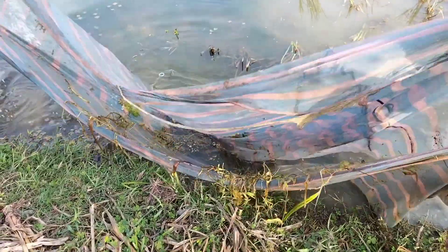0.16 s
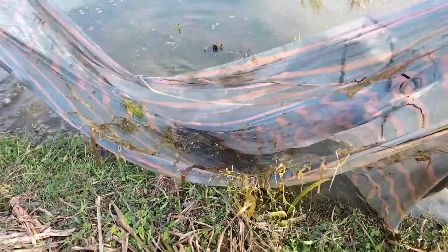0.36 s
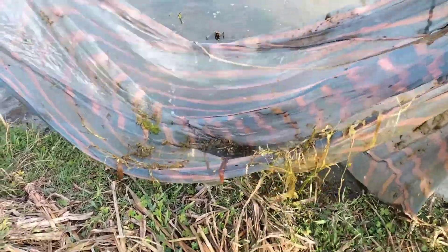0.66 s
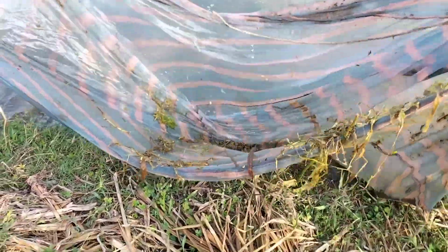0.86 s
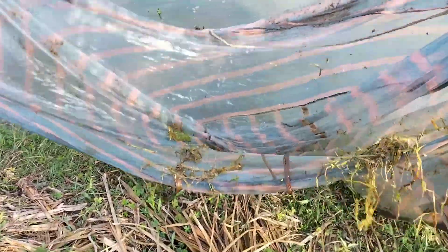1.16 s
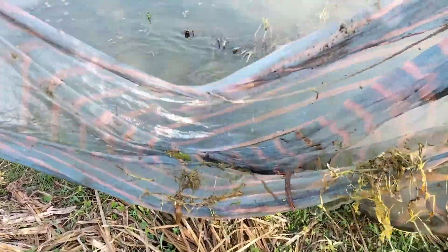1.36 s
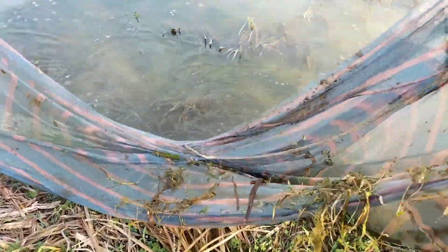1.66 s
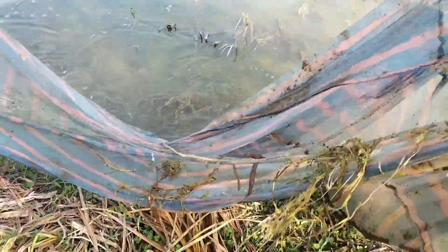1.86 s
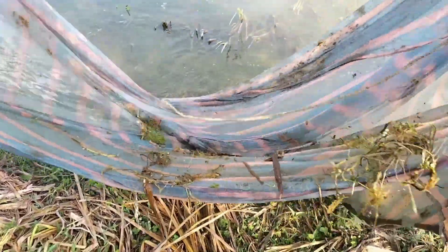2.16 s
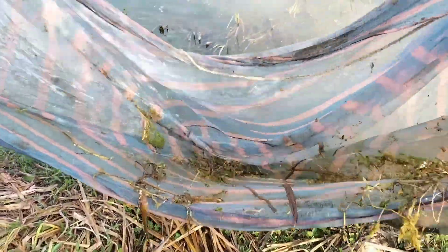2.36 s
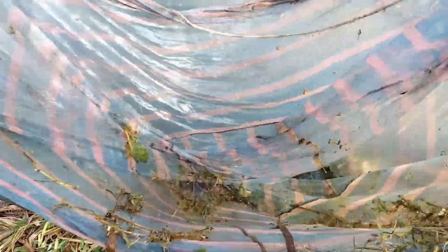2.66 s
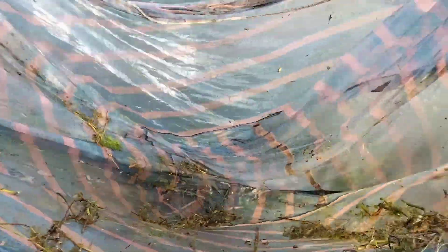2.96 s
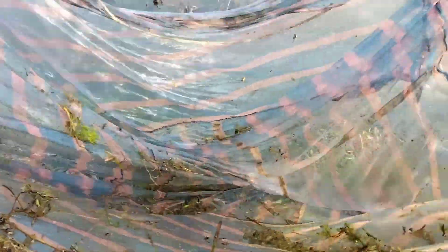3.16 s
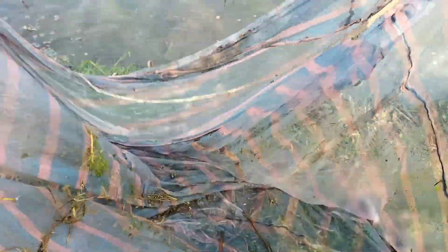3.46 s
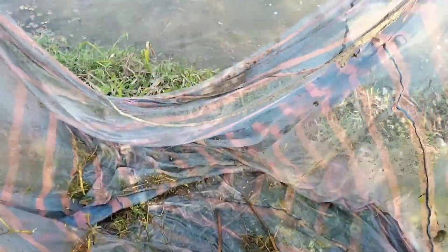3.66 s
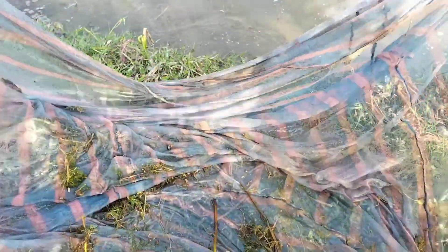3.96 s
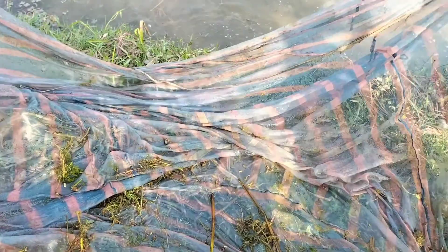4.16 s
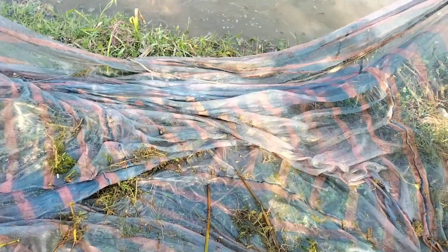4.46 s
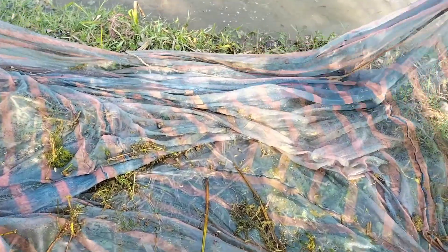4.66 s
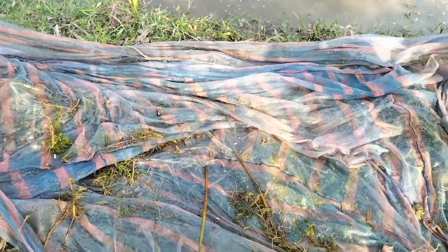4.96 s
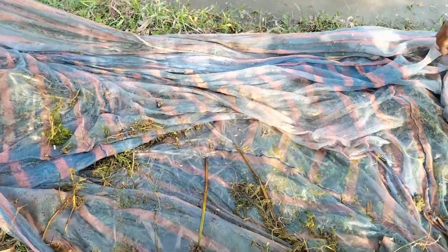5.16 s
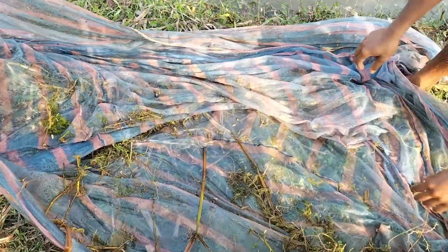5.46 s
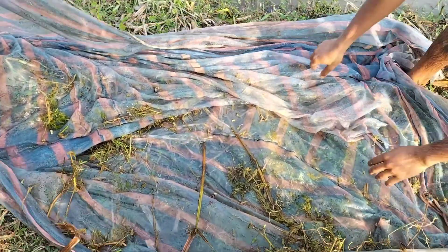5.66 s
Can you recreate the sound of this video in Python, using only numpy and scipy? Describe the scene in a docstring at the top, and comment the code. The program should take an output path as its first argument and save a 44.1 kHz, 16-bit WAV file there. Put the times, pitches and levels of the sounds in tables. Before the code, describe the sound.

Water bubbles and wet mesh rustles as a net is hauled ashore, dry stalks snapping, then birds chirp softly.

```python
"""Water sloshes and bubbles and wet mesh rustles: a fine net is hauled in tugs from a shallow pond.
Threads rub and slip over weeds, fizzing; trapped air rings as bubbles and gulps. Short squeaks, dry
stalks snapping on the bank, hard knocks. Behind, birds whistle and chirp, a far dove coos and
insect wings hum. Faint air hiss and a breeze on the microphone run throughout."""
import sys
import numpy as np
from scipy import signal
from scipy.fft import rfft, irfft
from scipy.io import wavfile
from scipy.ndimage import uniform_filter1d

SR = 44100
rng = np.random.default_rng(int(sys.argv[2]) if len(sys.argv) > 2 else 0)


def master_out(mix):
    """Clip the mix to full scale and print it as 16-bit PCM to the path in sys.argv[1]."""
    frames = np.transpose(np.atleast_2d(mix))
    ceiling = np.clip(frames, -1, 1)
    pcm = np.round(ceiling * 32767).astype(np.int16)
    wavfile.write(sys.argv[1], SR, pcm)


N = 255780
TIME_S = np.arange(N) / SR

# slow haul: t/s, rustle/dB, body/dB re rustle, fizz/dB re rustle, bubbling/dB
HAUL = [(0.0, -57, 7, -10, -49.5), (0.1, -58.5, -0.5, -12, -52), (0.24, -59.5, 6, -6.5, -55),
        (0.37, -56.5, 3, -6.5, -60.5), (0.52, -56, 2.5, -3, -62.5), (0.76, -54, 3, -10.5, -52),
        (0.93, -50.5, 4.5, -7.5, -51.5), (1.06, -46, -0.5, -12, -53.5), (1.29, -58, 5, -7.5, -61),
        (1.37, -57.5, 2.5, -7.5, -65), (1.84, -54.5, 5, -8, -63), (2.02, -62, 2, -10, -70),
        (2.73, -57.5, 5.5, -5, -61), (2.89, -50.5, 2, -5.5, -61), (3.09, -53.5, 2.5, -1.5, -61),
        (3.34, -60, 2, -4, -65), (3.58, -65, 4.5, -4.5, -66), (3.88, -63, 0, -10, -68.5),
        (4.23, -70, -2, -9, -69.5), (4.49, -71, 2, -13, -76.5), (4.62, -67, 3, -14, -71.5),
        (4.9, -70.5, 3, -12, -71), (5.17, -62.5, -1.5, -14, -71), (5.49, -57, -2, -16.5, -67.5),
        (5.69, -63, 0, -12.5, -71), (5.8, -74, 5, -10, -72)]
# tugs on the net: peak t/s, rise/s, fall/s, rustle gain/dB, extra fizz gain/dB, bubbling gain/dB
TUGS = [(.02, 0.021, 0.082, -1, 3, -2.5), (.17, 0.13, 0.19, 6.5, 2.5, -1),
        (.33, 0.056, 0.031, -9.5, 2.5, -4.5), (.41, 0.037, 0.087, 5.5, 0.5, 0.5),
        (0.628, 0.057, 0.006, 5.5, 2, 4.5), (.72, 0.018, 0.021, 8, -6, 6), (.84, 0.17, 0.047, 4, 4.5, 0),
        (1.174, 0.033, 0.066, 12, -1, 10), (1.3, 0.017, 0.28, 5.5, -3, 6),
        (1.532, 0.055, 0.059, 10.5, -4, 4.5), (1.65, 0.1, 0.039, 1.5, -1, 14),
        (1.921, 0.067, 0.45, 12, 5, 10), (2.179, 0.035, 0.03, 5.5, 11, -1), (2.22, 0.03, 0.076, 8.5, 7, 1),
        (2.31, 0.061, 0.027, 6, 15, 2), (2.41, 0.11, 0.1, 7, 2, 3.5), (2.72, 0.027, 0.066, 4.5, 8.5, 1),
        (2.8, 0.022, 0.085, 4, 4, 1), (2.95, 0.018, 0.019, 5.5, 4, 3.5), (3.17, 0.041, 0.47, 5.5, -2, 5.5),
        (3.53, 0.078, 0.054, 6.5, 0, 7), (3.859, 0.028, 0.027, 5.5, 9, 1), (4.49, 0.063, 0.074, 7, 4, 9.5),
        (4.7, 0.054, 0.065, 3, 4, 2), (5.33, 0.11, 0.089, 7, 2, 2), (5.62, 0.066, 0.088, 6.5, 2, 4.5),
        (5.68, 0.031, 0.015, 3.5, 4, 11.5)]
# low wash, before the bubbling's share: t/s, level/dB
WASH = [(0, -67), (.6, -68.5), (1.2, -66), (2, -64), (2.5, -59.5), (3, -62.5), (3.6, -60.5), (4.2, -65.5),
        (4.7, -64.5), (5.8, -66)]
# single bubbles: t/s, peak/dB, nominal f/Hz, t60/s (capped in bubble)
BUBBLES = [(0.058, -36.5, 3265, 0.042), (0.1, -38, 1030, 0.037), (0.161, -35, 960, 0.045),
           (0.179, -41, 2630, 0.023), (0.677, -48.5, 1070, 0.03), (0.69, -35.5, 2790, 0.061),
           (0.772, -36, 2700, .02), (0.931, -35, 2260, .025), (0.2, -39, 3250, 0.046),
           (0.22, -40, 3370, .04), (0.245, -38, 2980, .05), (0.759, -40, 1180, 0.015),
           (0.903, -35, 2200, 0.012), (0.904, -42.5, 955, 0.049), (0.927, -40, 966, 0.041),
           (0.956, -38.5, 1830, 0.027), (1.002, -45, 1036, 0.025), (1.087, -39, 1360, 0.015),
           (0.122, -37.5, 926, 0.039), (0.113, -34, 900, 0.09), (0.153, -22, 1324, 0.031),
           (0.167, -33, 1405, 0.042), (0.191, -35.5, 1400, 0.025), (0.206, -37.5, 1220, 0.08),
           (0.231, -36.5, 1610, 0.076), (0.424, -46.5, 950, 0.034), (0.433, -40, 1136, 0.015),
           (0.27, -44, 1300, 0.084), (3.636, -53, 1390, 0.03), (4.488, -45.5, 1040, 0.019),
           (0.436, -39.5, 1436, 0.078), (0.552, -42, 1360, 0.09), (0.578, -42.5, 1150, 0.043),
           (0.615, -40.5, 680, 0.025), (0.658, -43, 1300, 0.025), (0.724, -35.5, 1335, 0.022),
           (0.79, -37, 853, 0.033), (0.826, -39, 1420, 0.014), (0.872, -40.5, 1600, 0.022),
           (0.917, -37, 1677, 0.084), (0.973, -39.5, 1110, 0.074), (1.063, -38, 2130, 0.034),
           (1.532, -46, 1510, 0.069), (1.55, -36, 1790, 0.031), (1.613, -37.5, 832, 0.035),
           (1.911, -43.5, 960, 0.018), (2.208, -50.5, 1276, 0.073), (3.322, -44.5, 1620, 0.0079),
           (3.801, -52, 1625, 0.033), (5.354, -53, 1590, 0.047), (5.551, -48, 1740, 0.018)]
# gulps of trapped air: t/s, length/s, level/dB, start f/Hz, end f/Hz
GULPS = [(0.002, 0.042, -55, 395, 376), (0.043, 0.044, -56, 288, 297), (0.075, 0.028, -53.5, 327, 373),
         (1.285, 0.024, -55.5, 287, 310), (1.613, 0.066, -44.5, 181, 195), (1.614, 0.054, -40, 361, 396),
         (1.642, 0.067, -44.5, 272, 366), (1.714, 0.049, -39, 319, 285)]
# rubbing mesh spectrum: f/Hz, level/dB
MESH_SPECTRUM = [(1060, -53), (1800, -89), (1950, -14), (2080, -2), (2640, 7), (3720, 0.5), (4760, -3),
                 (5760, -2), (6200, -1.5), (6910, -2.5), (7920, -3), (9580, -19), (12800, -19),
                 (14500, -16), (15250, -12), (15800, -18.5)]
# resonant peaks that colour the rustle: f/Hz, width/Hz, gain/dB
RUSTLE_PEAKS = [(2200, 540, 4), (3280, 140, 5.5), (3620, 580, 8.5), (4000, 250, 6), (5900, 160, 1.5),
                (6760, 450, 6.5), (7120, 110, 6), (11400, 770, 0.5)]
# rustle colour as the net slackens: t/s, low edge gain/dB, gain between the ridges/dB
RUSTLE_COLOUR = [(0, 4, 2), (.26, 1.5, 4), (.3, -14.5, 2), (.36, -3.5, 4), (.45, -2, 3), (.7, 1.5, 0),
                 (1.1, -2, 0.5), (1.5, -4.5, -2.5), (1.9, -5, 0), (2.3, -2, 1.5), (2.7, -4, 1),
                 (3.1, 1.5, 1.5), (3.6, -1, -2.5), (4.2, 3.5, -2.5), (4.8, -3, -3), (5.2, -3.5, -5.5),
                 (5.501, -1, -8), (5.8, -2, -0.5)]
# highest fizz band: t/s, gain/dB
TOP_FIZZ = [(0, -4.5), (1.2, 2.5), (1.8, -5.5), (2.2, -9.5), (2.8, -8), (3.5, -5), (4.3, 2.5), (4.9, 3),
            (5.33, 11.5), (5.8, -0.5)]
# background air spectrum: f/Hz, level/dB
AIR_SPECTRUM = [(82, -26), (140, 6), (328, 7), (477, -49.5), (668, 5), (782, -22), (1050, -10), (1940, -18),
                (3590, -2.5), (4820, -69), (6890, -2), (9640, -56), (14900, -19), (15800, -43)]
# breeze: t/s, level/dB
BREEZE = [(0, -70), (.8, -68), (1.5, -72), (2.7, -70.5), (3.5, -69), (3.9, -68), (4.3, -70), (5, -70.5),
          (5.8, -71)]
# pips, squeaks and scrapes: t/s, level/dB, f/Hz, length/s
PIPS = [(0.29, -52, 3120, 0.021), (0.31, -47, 2840, 0.0086), (0.32, -57, 2760, 0.021),
        (0.366, -48, 2950, 0.014), (0.381, -52, 2540, 0.012), (2.79, -53, 5100, .03),
        (2.798, -54, 3610, .03), (2.842, -51.5, 3420, 0.049), (2.955, -57, 5780, 0.044),
        (3.03, -54, 3970, .04), (3.047, -59, 5850, 0.045), (3.095, -50, 3150, 0.055),
        (3.194, -54, 2200, .05), (4.328, -58, 3280, 0.011), (4.37, -67, 3150, .012),
        (4.417, -60.5, 3020, 0.02), (5.348, -51.5, 3470, 0.018), (5.38, -58, 3510, 0.013),
        (5.398, -58, 3620, 0.022)]
# stalk snaps: t/s, main ring peak/dB, deep, thud, bright, top gains/dB, main ring f/Hz, crackle t60/s
SNAPS = [(0.412, -41, -35, -28, -2, -20, 3280, 0.0069), (0.536, -41, -38, -5, -16, -19, 2450, 0.016),
         (0.614, -34.5, -33, -5.5, 3, -28, 2800, 0.01), (0.7242, -31, -38, -25, -23, -32, 2500, 0.013),
         (0.762, -36, -44, -16, -18, -27, 2560, 0.0074), (0.77, -26.5, -38, -20, -13, -30, 3170, 0.0064),
         (0.8221, -37, -20, -2.5, 6, -20, 2980, 0.0051), (0.9209, -30, -42, -29, -5, -7, 3320, 0.0031),
         (0.9973, -32.5, -43, -26, -3, -26, 4150, 0.0046), (1.023, -32, -39, -21, -20, -29, 3200, 0.0058),
         (1.063, -37.5, -27, -6, -16, -28, 3550, 0.0065),
         (1.1768, -13.5, -19.5, -6.5, 0.5, -23, 3500, 0.0093),
         (1.3294, -11, -39, -10, -1.5, -16.5, 3550, 0.0099), (1.6143, -35, -24, -7, -28, -24, 3400, 0.0081),
         (1.7691, -31.5, -15, -18, 6, -6, 3830, 0.015), (1.774, -33, -31, -25, 0, -20, 4300, 0.0085),
         (1.828, -49.5, -30, -25, -2, 1.5, 3800, 0.0045), (1.938, -24, -22.5, -11, -7, -12.5, 2370, 0.0049),
         (2.169, -42, -36, -27, -3, -8, 4250, 0.01), (2.177, -53.5, -30, -20, -5, 17, 3900, 0.0053),
         (2.2995, -53, -28, -19, 13, 9, 3520, 0.0041), (2.381, -47, -35, -30, -16, -23, 2900, 0.0064),
         (2.403, -30.5, -36, -24, -22, -30, 3790, 0.0043),
         (2.5239, -42, -19.5, -19, -14, -26, 3700, 0.0065),
         (2.7347, -42.5, -20, -22, 1.5, -24, 4030, 0.007), (2.797, -44, -25, -19, 7, -4, 3400, 0.008),
         (2.951, -47, -20, -17, 10, -18, 3540, 0.007), (3.555, -46, -17, -8, -15, -22, 3300, 0.0067),
         (3.715, -58, -27, -20, -15, -25, 3240, 0.0078), (3.7223, -45, -23, -23, -18, -29, 3260, 0.0046),
         (3.804, -50, -5.5, 1, -1, -23, 2770, 0.033), (3.8606, -48.5, -27, 2, 9.5, -18, 2520, 0.0093),
         (3.937, -49.5, -25, -0.5, 1, -17, 3200, 0.0052), (4.011, -51, -24, -17, 1, -12, 3580, 0.0058),
         (4.463, -62, -32, -20, 9.5, -20, 4150, 0.0063), (4.488, -54.5, -40, 12.5, -2, -29, 3950, 0.0075),
         (4.56, -51.5, -30, -13, -14, -26, 2200, 0.008), (4.6036, -50, -30, -25, -5, -29, 4000, 0.0057),
         (4.73, -53, -32, -25, -3, -20, 3300, 0.006), (4.757, -55, -30, -25, -10, -20, 3550, .007),
         (4.767, -65, -30, -25, 3, -8, 3800, .005), (4.86, -55.5, -34, -28, -1, -17, 3500, 0.006),
         (5.153, -59, -20, -25, 7, -5, 3900, 0.0052), (5.404, -54, -30, -25, 6, -6, 4470, 0.006),
         (5.4308, -46, -31, -33, -7, -21, 2580, 0.0045), (5.558, -46, -33, -14, 2, -14, 2290, 0.008),
         (5.62, -55, -30, -25, 12, -8, 4000, 0.0071)]
# fixed resonances that colour every snap: f/Hz, width/Hz, level/dB
SNAP_RESONANCES = [(109, 230, -14), (360, 900, 3), (746, 1040, 9.5), (1430, 450, 4), (1950, 710, -3),
                   (6630, 360, 2), (8300, 160, -14.5), (10300, 2300, 5.5), (12300, 2300, 1.5),
                   (15600, 500, -3)]
# knocks: t/s, level/dB, low, middle, top gains/dB
KNOCKS = [(1.7683, -8, 2, 4, 0), (1.994, -25, -24, -12, -21), (2.2136, -32, -19, -8, -3),
          (4.8007, -35, -30, -5, -15), (4.966, -41, -30, -10, -12), (5.078, -52, -30, -15, -12)]
# modes of the hard object: f/Hz, width/Hz, level/dB
KNOCK_MODES = [(152, 310, -16), (600, 1360, 0.5), (1300, 850, 2), (4140, 190, -9.5), (5730, 360, -3.5),
               (7540, 820, -8), (10340, 1240, -7)]
# long falling whistle: t/s, f/Hz, level/dB
FALLING_WHISTLE = [(2.06, 3960, -56), (2.095, 3893, -55), (2.135, 3750, -56), (2.17, 3662, -46),
                   (2.2, 3400, -55), (2.24, 2990, -46), (2.28, 2786, -54), (2.31, 2580, -61.5),
                   (2.358, 2370, -61), (2.4, 2260, -66)]
# whistled notes: t/s, length/s, level/dB, onset/dB re level, start, turn, end f/Hz,
# turn/length, loudest/length, bend exponent (1 = straight)
NOTES = [(3.489, 0.18, -56, -4, 3810, 3877, 4180, 0.68, 1, 1.5),
         (3.748, 0.092, -55.5, -13, 2460, 2540, 2260, 0.47, 0.41, 1.2),
         (4.039, 0.071, -64, -11, 2390, 2490, 2170, 0.46, 0.54, 1.7),
         (4.339, 0.078, -44, -13, 3930, 4184, 3340, 0.38, 0.38, 1.3),
         (4.559, 0.2, -44, -42, 2750, 3430, 1900, 0.39, 0.67, 1.64),
         (4.87, 0.13, -51, -5, 2120, 2460, 2080, 0.63, 0.65, 0.91),
         (5.133, 0.11, -61.5, -1, 3100, 2920, 2470, .72, 0.87, 1.4),
         (5.187, 0.13, -51, -18, 2070, 2430, 2200, 0.4, 0.48, 1.8),
         (5.56, 0.11, -51.5, -2, 2320, 2443, 1990, 0.46, 0.49, 1.45)]
# thin raspy chirr: columns as NOTES
CHIRR = 4.48, .19, -66, -5, 7500, 7800, 7250, .15, .8, .45
# dove coos: t/s, length/s, level/dB, f/Hz
COOS = [(3.47, 0.25, -74, 330.4), (4.463, 0.36, -77, 324.7), (4.978, 0.33, -72.5, 344),
        (5.343, 0.2, -66, 341), (5.59, .14, -67.5, 352)]
# insect wings: start t/s, end t/s, f/Hz, level/dB
WING_HUM = 3.85, 5.75, 670.5, -76.5
# second bird's rising chirps: t/s, level/dB, length/s
CHIRPS = [(4.046, -63, 0.084), (4.237, -62.5, 0.093), (4.471, -62.5, 0.097), (4.645, -63, 0.096),
          (4.904, -64, 0.092), (5.151, -63.5, .075), (5.51, -56, 0.08)]


def amp(db):
    return 10 ** (np.asarray(db) / 20)


def unit_rms(x):
    return x / np.sqrt(np.mean(x ** 2) + 1e-20)


def spectrum_db(points, hz):
    f, db = np.transpose(points)
    return np.interp(np.log(hz + 1), np.log(f + 1), db)


def curves(rows):
    """One per-sample curve for each column after t/s."""
    s, *columns = np.transpose(rows)
    return [np.interp(TIME_S, s, column) for column in columns]


def add(mix, s, sound):
    part = mix[max(round(s * SR), 0):][:len(sound)]
    part += sound[:len(part)]


def band(x, lo_hz, hi_hz):
    return signal.sosfilt(signal.butter(4, [lo_hz, hi_hz], "band", fs=SR, output="sos"), x)


def band_noise(lo_hz, hi_hz):
    return unit_rms(band(rng.standard_normal(N), lo_hz, hi_hz))


def wobble(n, span):
    return unit_rms(uniform_filter1d(rng.standard_normal(n), span))


def hiss(spectrum, patchy_db, flicker_db, streaky_db=0):
    """Noise with spectral patches, long narrow streaks and broadband flicker."""
    frames, hz = N // 128 + 5, np.fft.rfftfreq(512, 1 / SR)
    real, imag, patches, streaks = rng.standard_normal((frames, 257, 4)).T
    patches = unit_rms(uniform_filter1d(uniform_filter1d(patches, 6, axis=0), 12, axis=1))
    streaks = unit_rms(uniform_filter1d(uniform_filter1d(streaks, 3, axis=0), 36, axis=1))
    db = spectrum_db(spectrum, hz)[:, None] + patchy_db * patches + streaky_db * streaks
    db += flicker_db * wobble(frames, 3)
    return unit_rms(signal.istft((real + 1j * imag) * amp(db), nperseg=512, noverlap=384)[1][:N])


def bubble(hz, t60_s, climb=.045):
    """Soft-onset ring; pitch climbs as the bubble nears the surface."""
    t60_s = np.clip(t60_s, 1e-4, .065)
    t = np.arange(0, t60_s, 1 / SR)
    onset = 1 - np.exp(-t * hz / 13)
    return np.sin(2 * np.pi * hz * t * (1 + climb * t / t60_s)) * amp(-60 * t / t60_s) * onset


def grains(lo_hz, hi_hz, per_s, ringing, spread_db, pitches):
    """Random short rising rings, a few loud; t60 is 2.7 * ringing cycles."""
    clicks = amp(spread_db * np.minimum(rng.exponential(1, N), 5)) * (rng.random(N) < per_s / SR)
    pitch, out = rng.integers(0, pitches, N), np.zeros(N)
    for k, hz in enumerate(np.geomspace(lo_hz, hi_hz, pitches)):
        out += signal.oaconvolve(clicks * (pitch == k), bubble(hz, ringing * 2.7 / hz))[:N]
    return unit_rms(out)


def tone(rows, flutter, span):
    """Start t/s and sine along rows of t/s, f/Hz, level/dB; flutter is smoothed over span samples."""
    s, hz, db = np.transpose(rows)
    t = np.arange(s[0], s[-1], 1 / SR)
    hz = uniform_filter1d(np.interp(t, s, hz), 700, mode="nearest")
    wave = np.sin(2 * np.pi * np.cumsum(hz) / SR) * signal.windows.tukey(len(t), .25)
    wave *= 1 + flutter * wobble(len(t), span)
    return s[0], np.sqrt(2) * amp(np.interp(t, s, db)) * wave


def haul():
    """Slow pull plus tugs: rustle, body, fizz and bubbling levels/dB."""
    rustle_db, body_db, fizz_db, bubbling_db = curves(HAUL)
    tug_rustle_db, tug_fizz_db, tug_bubbling_db = sum(
        np.outer(gains_db, np.interp(TIME_S, [s - rise_s, s, s + fall_s], [0, 1, 0]))
        for s, rise_s, fall_s, *gains_db in TUGS)
    rustle_db += tug_rustle_db
    fizz_db += tug_fizz_db
    return rustle_db, rustle_db + body_db, rustle_db + fizz_db, bubbling_db + tug_bubbling_db


def water(bubbling_db):
    """Trapped air rings: a crowd of small bubbles, a low wash, single bubbles, deep gulps."""
    crowd = grains(650, 3110, per_s=1800, ringing=9, spread_db=3.4, pitches=24)
    crowd += amp(3) * band_noise(860, 1940)
    wash = grains(284, 566, per_s=170, ringing=2.9, spread_db=2, pitches=12)
    wash += amp(-2.5) * band_noise(213, 700)
    wash_db = curves(WASH)[0] + .81 * (bubbling_db + 56.5)
    out = amp(bubbling_db) * unit_rms(crowd) + amp(wash_db) * unit_rms(wash)
    for s, db, hz, t60_s in BUBBLES:
        neighbour = .43 * np.roll(bubble(hz * 1.02, t60_s), 150)
        ring = bubble(hz * .95, t60_s) + neighbour
        churn = unit_rms(uniform_filter1d(wobble(3000, 60), 60))
        ring *= 1 + .45 * churn[:len(ring)]
        add(out, s - .001, amp(db) * ring / abs(ring).max())
    for s, length_s, db, start_hz, end_hz in GULPS:
        gulp = [(s, start_hz, db - 3), (s + .26 * length_s, start_hz, db),
                (s + length_s, end_hz, db - 3.5)]
        add(out, *tone(gulp, flutter=.3, span=500))
    return out


def net(rustle_db, body_db, fizz_db):
    """Wet threads rub and slip over weed: hiss and tiny rings, in three ranges that follow the haul."""
    hz = np.fft.rfftfreq(N, 1 / SR)
    slips = grains(2000, 9000, per_s=1700, ringing=45, spread_db=2.6, pitches=40)
    slips += amp(-2) * grains(8600, 17000, per_s=900, ringing=2.5, spread_db=2.8, pitches=6)
    ticks = amp(-4) * grains(2200, 7000, per_s=500, ringing=6, spread_db=3.6, pitches=10)
    rings = unit_rms(irfft(rfft(slips + ticks) * amp(spectrum_db(MESH_SPECTRUM, hz)), N))
    rub = hiss(MESH_SPECTRUM, patchy_db=1.8, flicker_db=1.5, streaky_db=2.8) + amp(.5) * rings
    peaks_db = sum(db / (1 + (2 * (hz - f) / width) ** 2) for f, width, db in RUSTLE_PEAKS)
    spectrum = rfft(rub) * amp(peaks_db)
    splits_hz = 1500, 2950, 4250, 4700, 6200, 9000, 12600, 20000
    lowpassed = [irfft(spectrum / (1 + (hz / f) ** 16), N) for f in splits_hz]
    low, ridge, dip, slope, upper, high, top = np.diff(lowpassed, axis=0)
    edge_gain, between_gain = amp(curves(RUSTLE_COLOUR))
    body = unit_rms(low * edge_gain + ridge + dip * between_gain)
    rustle = unit_rms(slope * between_gain + upper)
    fizz = unit_rms(high + top * amp(curves(TOP_FIZZ)[0]))
    return amp(body_db) * body + amp(rustle_db) * rustle + amp(fizz_db) * fizz


def air():
    """Faint flickering outdoor hiss."""
    return band(amp(-69) * hiss(AIR_SPECTRUM, patchy_db=2, flicker_db=2.5), 191, 21000)


def breeze():
    """Lumpy wind rumble on the microphone."""
    lumps_db = 2.1 * wobble(N, 8000)
    return amp(curves(BREEZE)[0] + lumps_db) * band_noise(63.4, 162.5)


def pips():
    """Short pips, squeaks and scrapes, each on one pitch."""
    out = np.zeros(N)
    for s, db, hz, length_s in PIPS:
        add(out, *tone([(s, hz, db), (s + length_s, hz, db)], flutter=.5, span=90))
    return out


def tree_echo(sound, t60_s=.18, echo_db=-17):
    """Sound plus its diffuse echo from the trees."""
    t = np.arange(SR // 4) / SR
    tail = rng.standard_normal(len(t)) * amp(-60 * t / t60_s)
    return sound + amp(echo_db) * signal.oaconvolve(sound, tail / np.linalg.norm(tail))[:N]


def stalks(ring_width_hz=350, overtone_ratio=1.54):
    """A break and a dying crackle ring the stalk and fixed resonances; the weeds hiss briefly after."""
    t, out = np.arange(1500) / SR, np.zeros(N)
    for s, db, deep_db, thud_db, bright_db, top_db, ring_hz, t60_s in SNAPS:
        fibres = rng.standard_normal(len(t)) * np.minimum(amp(-30 + 30 * t / .001), 1)
        crackle = fibres * amp(-60 * np.maximum(t - .001, 0) / t60_s)
        crackle_db = -11.5 + 1203.5 * (t60_s - .007)  # longer is stronger
        drive = 2 * amp(crackle_db) * crackle / np.linalg.norm(crackle)
        drive[44] += amp(.3 * (db + 10))  # break at 1 ms, sharpest in loud snaps
        weeds = amp(-34 - 60 * t / .05) * fibres
        own_modes = [(ring_hz, ring_width_hz, 0), (overtone_ratio * ring_hz, ring_width_hz, -3)]
        gains_db = deep_db, thud_db, 0, bright_db, top_db
        for hz, width_hz, mode_db in SNAP_RESONANCES + own_modes:
            ring = t * np.exp(-2 * np.pi * width_hz * t) * np.sin(2 * np.pi * hz * t)
            push = drive * amp(-60 * t / .006 * (hz < 800)) + (hz > 1900) * weeds
            mode = np.convolve(push, ring)[:len(t)]
            mode = band(mode, hz / 2 if hz > 800 else 75, 20000)  # little radiates below the ring
            range_db = gains_db[np.searchsorted([800, 1900, 4700, 9000], hz)]
            add(out, s, amp(db + mode_db + range_db) * mode / abs(mode).max())
    return band(out, 20, 18000)


def knocks():
    """One short push rings the damped modes of a hard object."""
    t, out = np.arange(1500) / SR, np.zeros(N)
    for s, db, low_db, middle_db, top_db in KNOCKS:
        for k, (hz, width_hz, mode_db) in enumerate(KNOCK_MODES):
            polarity = (-1) ** min(k, 3)
            ring = polarity * np.exp(-np.pi * width_hz * t) * np.sin(2 * np.pi * hz * t)
            range_db = [low_db, middle_db, 0, top_db][np.searchsorted([2000, 4700, 7000], hz)]
            add(out, s, amp(db + mode_db + range_db) * ring / abs(ring).max())
    return band(out, 60, 20000)


def note(s, length_s, db, onset_db, start_hz, turn_hz, end_hz, turn, loudest, bend):
    """Rows for tone: pitch bends through a turning point, level swells and fades."""
    u = np.linspace(0, 1, 21)
    turn, loudest = np.clip([turn, loudest], .05, .95)
    early, late = np.clip(1 - u / turn, 0, 1), np.clip((u - turn) / (1 - turn), 0, 1)
    hz = turn_hz + (start_hz - turn_hz) * early ** 1.6 + (end_hz - turn_hz) * late ** bend
    swell_db = onset_db * np.clip(1 - u / loudest, 0, 1)
    fade_db = -13 * np.clip((u - loudest) / (1 - loudest), 0, 1) ** 1.8
    return np.transpose([s + u * length_s, hz, db + swell_db + fade_db])


def whistles():
    """Bird whistles and a high chirr; moving air makes them flutter."""
    out = np.zeros(N)
    for row in NOTES:
        add(out, *tone(note(*row), flutter=.3, span=250))
    add(out, *tone(FALLING_WHISTLE, flutter=.35, span=300))
    add(out, *tone(note(*CHIRR), flutter=1.6, span=130))
    return out


def dove():
    """Far coos: low tones that sag slightly."""
    out = np.zeros(N)
    for s, length_s, db, hz in COOS:
        coo = [(s, hz * 1.01, db), (s + length_s, hz * .99, db - .5)]
        add(out, *tone(coo, flutter=.3, span=1200))
    return out


def insect():
    """Wing beats: a thin tone, wavering in pitch and level."""
    start_s, end_s, hz, db = WING_HUM
    wave = np.sin(2 * np.pi * np.cumsum(hz * (1 + .014 * wobble(N, 4000))) / SR)
    wave *= amp(db + 3 * wobble(N, 3000))
    return wave * np.interp(TIME_S, [start_s, start_s + .12, end_s - .2, end_s], [0, 1, 1, 0])


def chirps(start_hz=3400, end_hz=4550, lower_ratio=.92, lower_db=-8.5):
    """Second bird: rough rising sweeps in two strands."""
    out = np.zeros(N)
    for s, db, length_s in CHIRPS:
        sweep = np.array([(s, start_hz, db - 3), (s + length_s / 2, .36 * start_hz + .64 * end_hz, db),
                          (s + length_s, end_hz, db - 9)])
        add(out, *tone(sweep, flutter=.8, span=90))
        add(out, *tone(sweep * [1, lower_ratio, 1] + [0, 0, lower_db], flutter=.94, span=60))
    return out


def scene():
    """Mono sum of all sources."""
    rustle_db, body_db, fizz_db, bubbling_db = haul()
    mix = air() + net(rustle_db, body_db, fizz_db) + water(bubbling_db) + stalks() + knocks()
    mix += tree_echo(whistles() + chirps() + pips() + dove())
    return (mix + insect() + breeze())[None]


def record(dry, cutoff_hz=15480):
    """Recorder band limit."""
    lowpass = signal.firwin(511, cutoff_hz, window=("kaiser", 9), fs=SR)
    return signal.oaconvolve(dry, lowpass[None], "same")


dry = scene()
out = record(dry)
master_out(out)
```